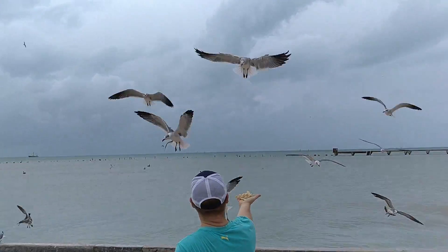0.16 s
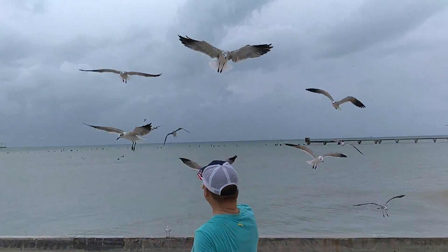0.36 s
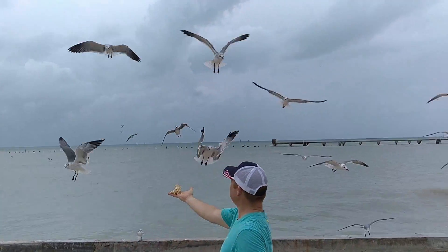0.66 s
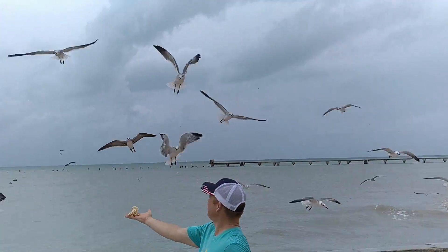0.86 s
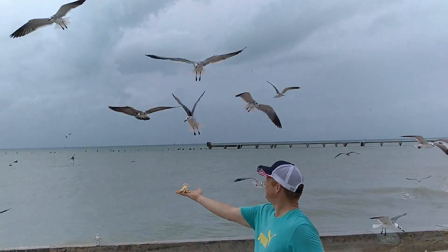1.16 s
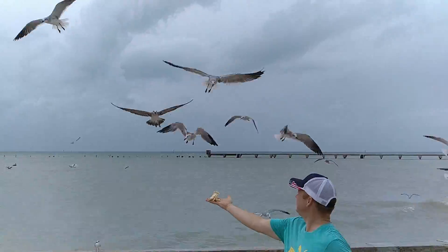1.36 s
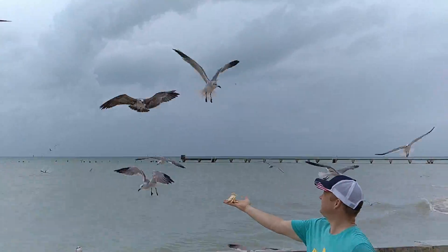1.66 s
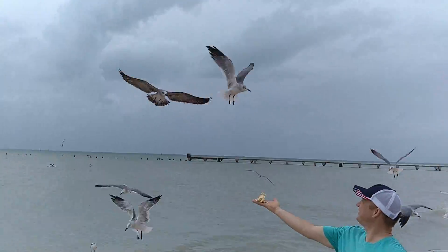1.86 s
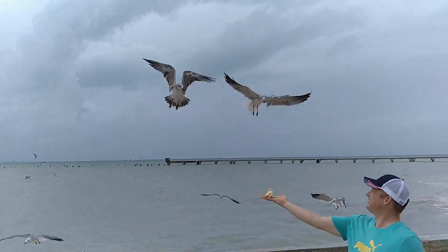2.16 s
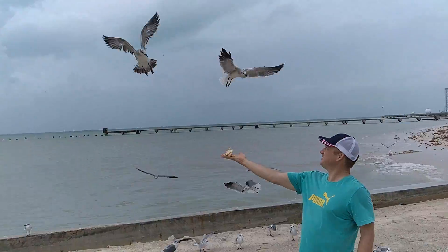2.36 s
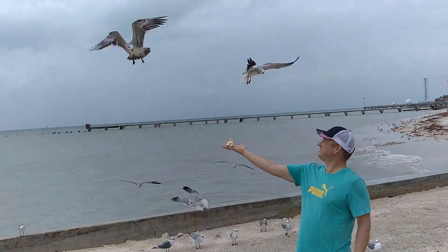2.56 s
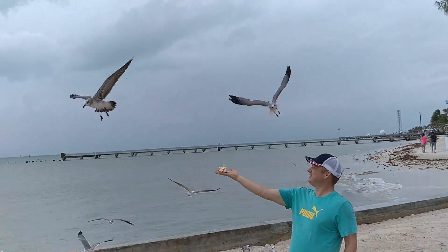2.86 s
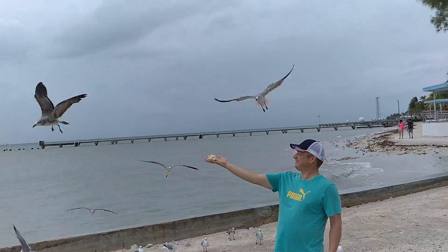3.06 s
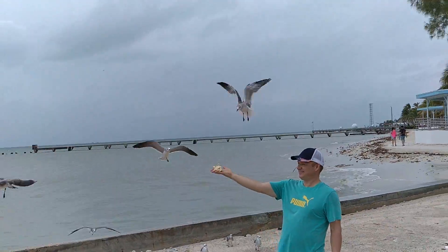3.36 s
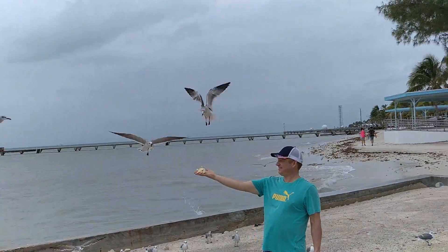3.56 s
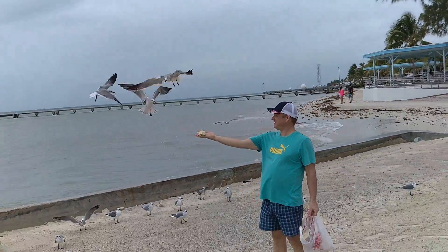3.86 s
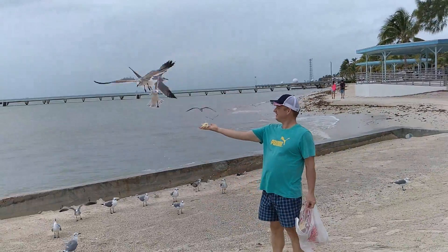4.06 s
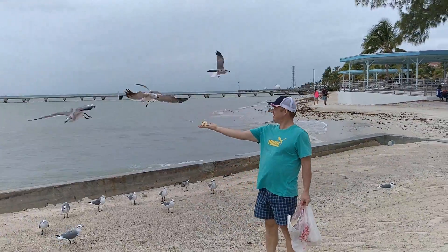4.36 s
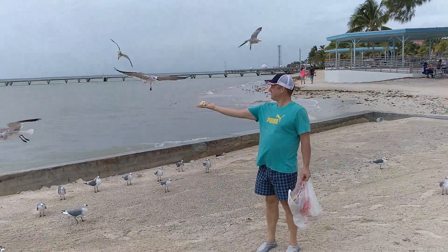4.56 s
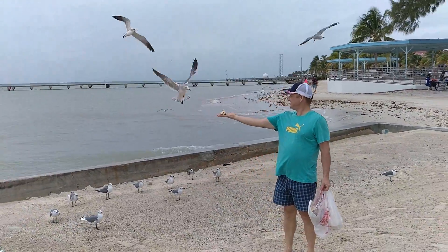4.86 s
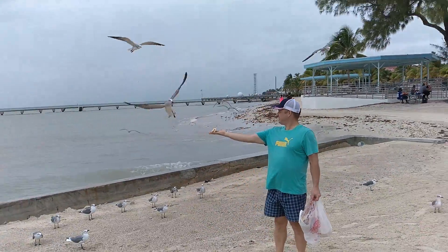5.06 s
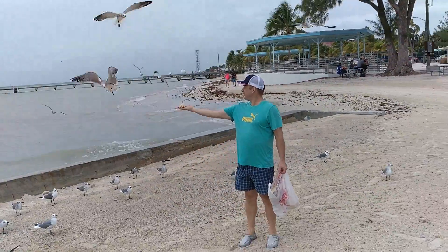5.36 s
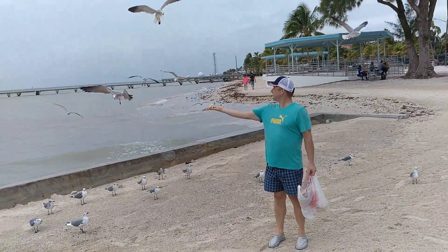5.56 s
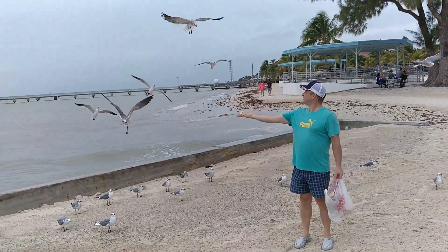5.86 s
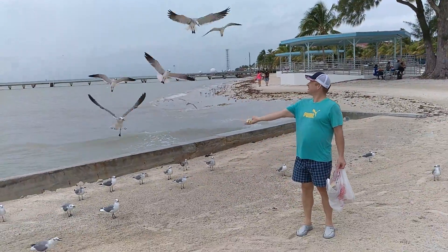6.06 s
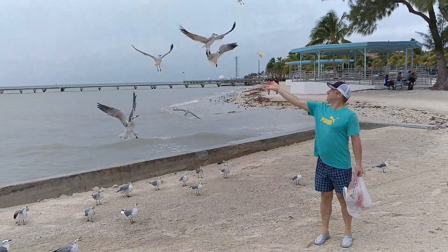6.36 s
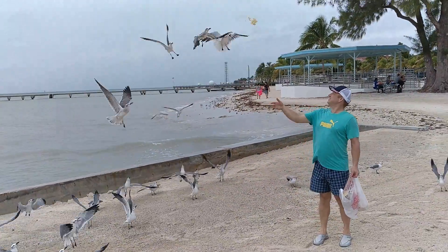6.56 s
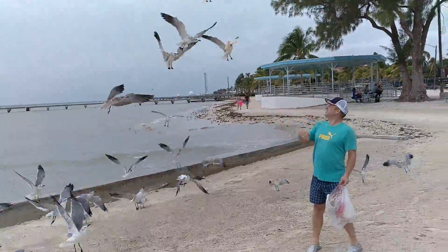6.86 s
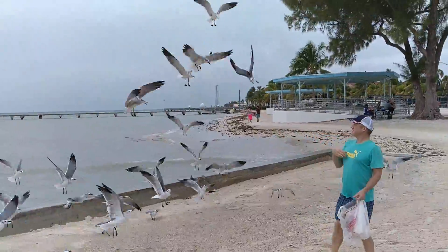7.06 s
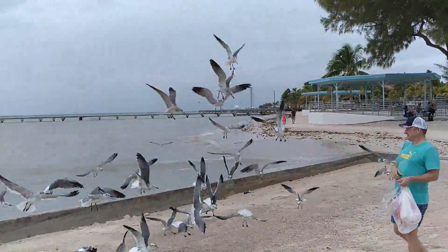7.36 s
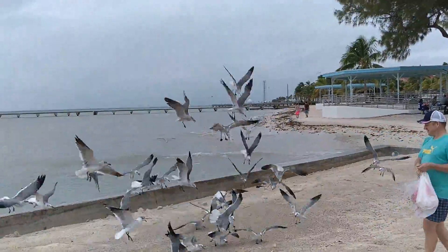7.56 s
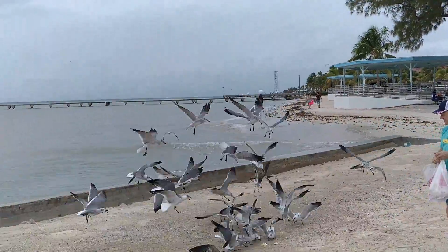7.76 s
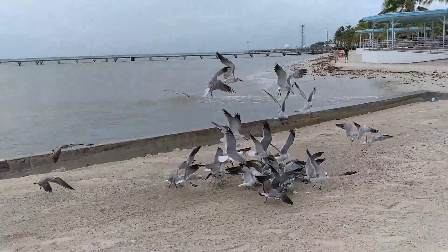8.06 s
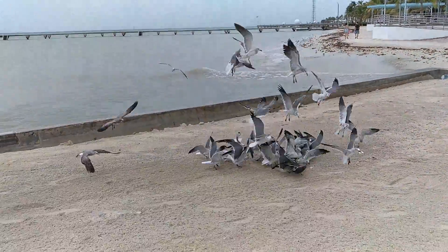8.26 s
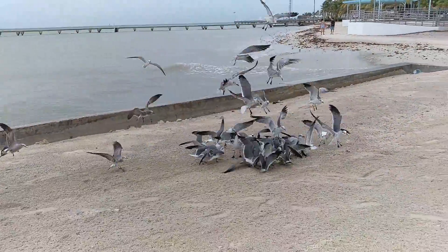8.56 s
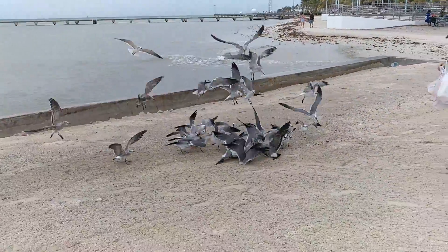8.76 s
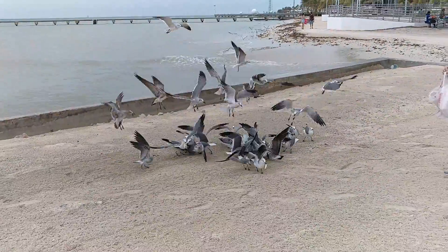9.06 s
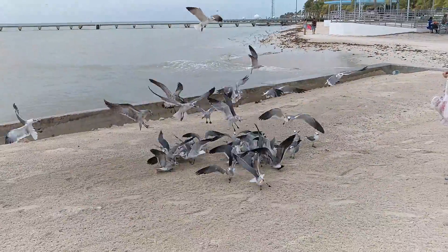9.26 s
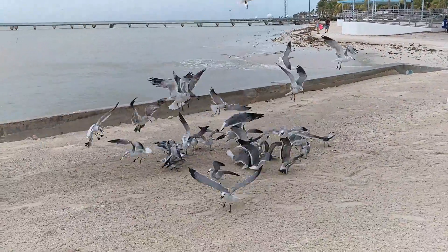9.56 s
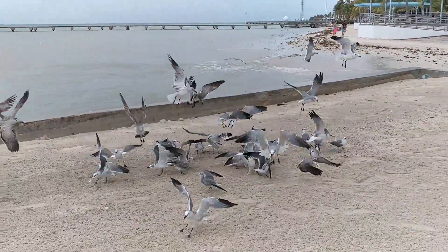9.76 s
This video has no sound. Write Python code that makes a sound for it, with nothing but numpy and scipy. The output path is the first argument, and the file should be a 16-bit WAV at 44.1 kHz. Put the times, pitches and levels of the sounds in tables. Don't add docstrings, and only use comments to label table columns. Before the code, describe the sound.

Outdoors on an open beach, a gull flock calls a few metres from a small stereo microphone. Round hoots and hoarse rasps open in a puff of wind, then nasal croaks, thin squeaks and cries that crack upward. Later the calls thicken and explode into a dense, screaming food fight, easing to hoarse squabbling while low wind thumps hit the microphone over faint surf.

```python
import sys
import numpy as np
from scipy import signal
from scipy.fft import rfft, irfft, next_fast_len
from scipy.io import wavfile
from scipy.ndimage import uniform_filter1d, minimum_filter1d

SR = 44100
rng = np.random.default_rng(int(sys.argv[2]) if len(sys.argv) > 2 else 0)


def transcribe(signal):
    frames = np.atleast_2d(signal).T
    limited = np.clip(frames, -1, 1)
    pcm = np.round(limited * 32767).astype(np.int16)
    wavfile.write(sys.argv[1], SR, pcm)


def field_ratio(decibels):
    return 10 ** (np.asarray(decibels, dtype=float) / 20)


N = 437472

# t/s, left delay/samples
BEARING = [(0, 9), (6.3, 10), (7, 6), (8, 0), (9, 2)]
# t/s, level/dB
TIRING = [(7.9, 4.5), (8.3, 0.5), (8.31, 2)]
NOTE_FALL_DB = 9.5
NASAL_BEAK_DB = -18.5


def evened(x):
    return x / np.sqrt(np.mean(x ** 2) + 1e-20)


def coloured(x, points):
    size = next_fast_len(N)
    f, db = np.transpose(points)
    log_hz = np.log(np.fft.rfftfreq(size, 1 / SR) + 1)
    gain = field_ratio(np.interp(log_hz, np.log(f), db, left=-90, right=-90))
    return evened(irfft(rfft(x, size) * gain, size)[..., :N])


def wander(shape, span):
    span = max(int(span), 2)
    noise = rng.standard_normal(shape)
    return uniform_filter1d(uniform_filter1d(noise, span), span) * np.sqrt(1.5 * span)


def along(rows, column):
    rows = np.array(rows)
    return np.interp(np.arange(N) / SR, rows[:, 0], rows[:, column])


def surf():
    # f/Hz, level/dB
    surf_colour = [(500, -2), (900, -4), (3000, -13), (4500, -23.5), (15500, -26.5)]
    near, apart = rng.standard_normal(N), rng.standard_normal((2, N))
    level = field_ratio(-47 + 2.0 * wander(N, 28500))
    return level * coloured(near + .5 * apart, surf_colour)


def wind():
    # t/s, level/dB
    wind_level = [(0.0, -24), (0.33, -39.5), (2.37, -39), (2.57, -34), (2.6, -36.5), (3.5, -34.5),
                  (4.2, -35.5), (5.6, -38.5), (6.1, -35.5), (6.6, -38), (7.93, -39), (8.01, -27),
                  (9.59, -28), (9.92, -19)]
    # f/Hz, level/dB
    wind_colour = [(18, -19.5), (40, -12), (80, -1.5), (140, -1.5), (250, -10), (700, -28)]
    # t/s, half the left-right difference/dB
    wind_side = [(0, 1), (9.4, 1.25), (9.7, -2)]
    # t/s, peak level/dB, left-right difference/dB
    thumps = [
        (3.151, -10, 18),
        (7.986, -7, -28.5),
        (8.787, -8, 22.5),
              (2.534, -12.5, 24.5),
        (6.43, -15.5, 11.7),
        (6.459, -14, 17.4),
        (6.502, -16.5, 11.47),
              (8.069, -8.5, 8),
        (8.157, -12, -15),
        (8.63, -24, -15.5),
        (8.789, -18.5, 12),
        (8.943, -7, 25.5),
        (9.343, -13.5, 3.5),
    ]
    lumps = field_ratio(2.5 * wander((2, N), 900) + 1.2 * wander((2, N), 5000))
    out = rng.standard_normal((2, N)) * lumps
    out = out + .08 * out[::-1]
    side_db = along(wind_side, 1) * np.array([[1], [-1]])
    out = coloured(out, wind_colour) * field_ratio(along(wind_level, 1) + 2.5 + side_db)
    u = np.arange(-800, 800) / SR * 450
    pressure_pulse = (1 - 2 * u ** 2) * np.exp(-u ** 2)
    for s, db, pan_db in thumps:
        port_gain = np.minimum(field_ratio(np.array([[pan_db], [-pan_db]])), 1)
        start = round((s + .007) * SR) - 800
        out[:, start:][:, :1600] += field_ratio(db) * pressure_pulse * port_gain
    return out


def held(column, blur=800):
    # t/s, length/s, level/dB, treble
    # over body/dB
    chatter = [(0.0, 0.51, -32.5, -12), (0.512, 1.29, -29, -4), (1.895, 0.4, -40, -1),
               (2.819, 0.94, -31, -8), (3.725, 0.13, -45, -47.5), (3.834, 0.62, -33, -38.5),
               (4.341, 0.58, -34.5, 3.5), (5.522, 0.44, -34, -35), (6.047, 0.32, -34, -42.5),
               (5.204, 0.032, -49, -3), (5.29, .23, -48, 9), (6.37, 0.092, -34.5, 6),
               (6.47, .95, -31, -1.5), (7.355, .3, -24, -7.5), (7.614, .6, -17.5, -2.5),
               (8.103, .25, -18, -0.5), (8.306, .95, -27.5, -13.5), (9.188, 0.74, -30, -12)]
    squawks = [(0.0, 0.219, -30, -5.5), (0.805, 0.223, -24.5, -3), (0.86, 0.029, -18, -6.5),
               (1.194, 0.2184, -25, -3.5), (1.572, 0.097, -24.5, -5), (1.724, 0.1467, -28.5, 2.5),
               (1.996, 0.0417, -22, -15), (2.147, 0.111, -27, -10.5), (2.393, 0.119, -24.5, -7),
               (2.577, 0.103, -29, 0.5), (2.818, 0.164, -28.5, -5.5), (3.052, 0.0744, -29.5, -4),
               (3.288, 0.0382, -23.5, -11.5), (5.424, .012, -32.5, 1), (3.448, 0.0608, -31.5, -7),
               (3.83, 0.0604, -34, -48.5), (4.045, 0.1724, -32, -18), (4.206, 0.0635, -26.5, -10),
               (4.35, 0.1177, -26, -4.5), (4.599, 0.0667, -30.5, -0.5), (5.518, 0.087, -30, -19),
               (6.039, 0.027, -35.5, -47.5), (6.265, 0.048, -26.5, -28), (6.466, 0.12, -26.5, -5.5),
               (6.911, 0.0515, -27.5, 5), (7.048, 0.0304, -23, -8.5), (7.095, 0.106, -28, -11.5),
               (8.305, 0.2367, -23.5, -6), (8.628, 0.217, -22.5, -8), (9.256, 0.0632, -26.5, 0.5),
               (9.716, 0.172, -35.5, -35.5), (9.901, 0.033, -25, -29)]
    lull = (12, 0, -63.5, -3)
    out = np.full(N, float(lull[column]))
    for row in chatter + squawks:
        out[round(row[0] * SR):round((row[0] + row[1]) * SR)] = row[column]
    return uniform_filter1d(out, int(blur), mode="nearest")


def patchy(x, depth_db=3.5):
    z = signal.stft(x, nperseg=512)[2]
    patches = evened(wander(z.shape[1:], 12))
    patches = evened(uniform_filter1d(patches, 6, axis=0))
    out = signal.istft(z * field_ratio(depth_db * patches), nperseg=512)[1][:, :N]
    return out / field_ratio(depth_db ** 2 / 8.7)


def rasp():
    pulse_rates = [252.56, 290.32, 505.86]
    # f/Hz, level/dB
    throat_body = [(600, -30.5), (1300, -18), (1800, -7.5), (2400, -7), (3500, -12.5), (4500, -14),
                   (5500, -15)]
    # f/Hz, level/dB
    throat_treble = [(5200, -15.5), (6100, 2.5), (6900, -2), (7900, -8), (9500, -3.5), (12000, -8.5),
                     (13000, -18), (16000, -16.5)]
    # f/Hz, level/dB
    full_stretch = [(2600, -22.5), (3300, -1), (4000, 1), (5000, -17.5), (5800, -10)]
    # t/s, level over the body/dB
    stretching = [(7.55, -53), (7.7, -7.5), (8.3, -6.5), (8.8, -17), (9.0, -37.5)]
    drive = np.zeros((2, N))
    since = np.arange(N) / SR - held(column=0, blur=1)
    for hz, spread in zip(pulse_rates, (0, -3, 2)):
        climb = .25 * np.tanh(since / .1)
        jitter = .06 * wander(N, 4000) + .035 * wander(N, 90)
        turns = np.cumsum(hz * (1 + climb + jitter)) / SR
        pulses = np.diff(np.floor(turns), prepend=0) * field_ratio(2.0 * rng.standard_normal(N))
        puffs = np.exp(-(turns % 1) / 2.6) * rng.standard_normal(N)
        bird = (evened(pulses) + .15 * evened(puffs)) * field_ratio(7.0 * wander(N, 5000))
        late = np.clip(np.arange(N) - along(BEARING, 1) - spread, 0, N - 1)
        drive += [bird[late.astype(int)], bird]
    drive = irfft(rfft(drive) * np.exp(-400j * np.fft.rfftfreq(N) ** 2 * np.pi), N)
    drive /= np.sqrt(uniform_filter1d(drive[1] ** 2, 1500) + 1e-3)
    drive = patchy(drive + .2 * rng.standard_normal((2, N)))
    body = coloured(drive, throat_body)
    treble = coloured(drive, throat_treble) * field_ratio(held(column=3))
    strain = coloured(drive, full_stretch) * field_ratio(along(stretching, 1))
    return field_ratio(held(column=2) + along(TIRING, 1)) * (body + treble + strain)


def syrinx_tone(mix, rows, db, throat_hz, fall_db, delay, waver=0.00507, flutter_db=2.0, beak_db=-31,
                notch_db=0, swell_db=2.61, hoarse=0):
    # first t/s, last t/s
    scream_span = (7.5, 8.4)
    s, hz = np.transpose(rows)
    t = np.arange(s[0] - .006, s[-1] + 0.0075, 1 / SR)
    hz = uniform_filter1d(np.interp(t, s, hz), min(len(t) // 4, 400), mode="nearest")
    fighting = s[0] > 8.9
    hz *= 1 + waver * wander(len(t), 260) + fighting * .004 * wander(len(t), 600)
    hoarse = max(hoarse, scream_span[0] < s[0] < scream_span[1])
    hz *= 1 + hoarse * .009 * wander(len(t), 110)
    k = np.arange(1, min(int(15500 / hz.max()), 20) + 1)[:, None]
    octaves = np.log2(k * hz / throat_hz)
    slope_db = -fall_db * np.where(octaves > 0, octaves, -1.3 * octaves)
    air_db = 2.0 * np.maximum(k * hz / 1000 - 10, 0)
    shape = field_ratio(slope_db - 4.32 * octaves ** 2 - air_db)
    beak_peak_db = beak_db - (s[0] > 8.85) * 14.7
    shape = shape + shape.max(0) * field_ratio(beak_peak_db - 12.4 * np.log2(k * hz / 10800) ** 2)
    shape = shape * field_ratio(notch_db * np.exp(-((k * hz - 5700) / 900) ** 2))
    flutter = field_ratio(flutter_db * wander((len(k), len(t)), 500))
    shape = shape / np.sqrt((shape ** 2).sum(0) / 2) * flutter
    middle = 2 * (t - t[0]) / (t[-1] - t[0]) - 1
    fade = np.clip(np.minimum(t - t[0], t[-1] - t) / 0.00682, 0, 1)
    level = field_ratio(db - swell_db * middle ** 2) * fade
    level = level * field_ratio(fighting * 2 * wander(len(t), 700) + hoarse * 3.5 * wander(len(t), 150))
    turns = np.cumsum(hz) / SR
    for port, late in zip(mix, (delay, 0)):
        phase = 2 * np.pi * k * (turns - hz * (late % 1) / SR) + k ** 2
        tone = level * (shape * np.sin(phase)).sum(0)
        part = port[max(round(t[0] * SR) + int(late // 1), 0):][:len(t)]
        part += tone[:len(part)]


def brawl(count=200):
    mix = np.zeros((2, N))
    for when, pitch, bend, length, place, db in rng.random((count, 6)):
        s, hz = 9.8 * (1 - when ** 2.4), 1000 * 2.6 ** pitch
        end = s + .07 + .1 * length
        arch = [(s, hz * (1 - .15 * bend)), (s + .03, hz), (end - .03, hz * 1.03), (end, hz * .9)]
        syrinx_tone(mix, arch, 5.0 * db, 2600 + 700 * bend, 9.0, 14 * place - 2,
                    waver=0.0135, flutter_db=4, beak_db=-45)
    return field_ratio(held(column=2, blur=1500) + along(TIRING, 1) - 11.5) * mix


def short_notes(mix):
    # t/s, length/s, first f/Hz, last f/Hz, level/dB
    squeaks = [(0.006, 0.038, 5080, 4860, -29), (1.046, 0.112, 3454, 3302, -31.5),
               (1.876, 0.083, 3305, 3100, -43), (2.59, 0.06, 4231, 4181, -24.5),
               (4.087, 0.112, 4663, 4869, -43), (6.57, 0.019, 3715, 3625, -22.5),
               (6.541, 0.0462, 2500, 2836, -24), (7.553, 0.117, 2386, 2658, -21.5),
               (8.854, 0.1122, 3151, 3126, -33), (9.181, 0.0385, 2425, 2224, -22.5),
               (9.267, 0.063, 2412, 2688, -28.5), (9.707, 0.168, 3302, 3468, -31.5),
               (2.509, 0.092, 2889, 3172, -24.5), (2.761, 0.168, 3367, 3063, -29.5),
               (4.2, 0.087, 3297, 3246, -23.5), (4.962, 0.0223, 3306, 2942, -29.5),
               (6.75, 0.0807, 4231, 3930, -33), (7.271, 0.0648, 3400, 3518, -20.5),
               (7.353, 0.233, 3370, 3211, -27.5), (9.284, 0.043, 3540, 3806, -28.5),
               (9.342, 0.0445, 3386, 3374, -26.5), (1.237, 0.0295, 3750, 3940, -32),
               (1.265, .04, 3450, 3600, -24.5), (1.239, 0.027, 2870, 2926, -37),
               (0.081, 0.0523, 3690, 3982, -35.5), (5.081, 0.03, 5440, 5070, -53.5),
               (5.098, 0.096, 3137, 3280, -55.5), (9.57, 0.0153, 4737, 4555, -33.5),
               (9.61, 0.0246, 2446, 2232, -24.5), (9.428, 0.0774, 3600, 3380, -28.5),
               (9.536, 0.0294, 3395, 3625, -28)]
    yelps = [(0.432, 0.062, 1655, 1938, -22.5), (0.604, 0.21, 2375, 2381, -28),
             (1.206, 0.127, 1937, 2155, -20), (5.791, 0.0565, 1863, 2015, -22),
             (5.868, 0.028, 1947, 1747, -19), (6.738, 0.0703, 1492, 1337, -34),
             (6.635, 0.064, 2164, 1953, -22.5), (1.13, 0.126, 2150, 2300, -37.5),
             (2.876, 0.016, 2014, 1882, -19.5), (6.422, 0.0802, 1259, 1360, -31.5),
             (7.802, 0.1198, 1830, 1950, -43), (8.03, 0.0802, 1497, 1563, -32.5),
             (8.241, 0.1126, 1706, 1630, -26), (8.365, 0.082, 1634, 1567, -29.5),
             (8.888, 0.02707, 2235, 1906, -28.5), (8.899, .07, 1430, 1362, -31.5),
             (9.0, 0.0845, 1975, 1820, -28.5), (9.069, 0.032, 2388, 2498, -36.5),
             (9.123, 0.0352, 1802, 1562, -30.5), (9.6, 0.099, 2395, 2353, -34.5),
             (9.897, 0.031, 2025, 2246, -24), (6.925, 0.0874, 2000, 2174, -28)]
    barks = [(0.756, 0.15, 1320, 1330, -52.5), (3.209, 0.074, 994, 982.7, -23.5),
             (3.319, 0.146, 917.3, 1039, -24.5), (4.156, 0.0507, 1147, 1188, -23.5),
             (4.391, 0.029, 1187, 1259, -17.5), (5.294, 0.0205, 1444, 1608, -29.5),
             (5.519, 0.059, 332.4, 403, -36.5), (5.78, 0.089, 1431, 1460, -30.5),
             (6.631, 0.095, 696, 641, -31.5), (6.938, 0.0454, 1009, 1020, -19.5),
             (8.55, 0.044, 1291, 1006, -30)]
    notes = [(row, 1.371 * row[2], -28) for row in squeaks]
    notes += [(row, row[2], -36) for row in yelps]
    notes += [(row, 2554, NASAL_BEAK_DB) for row in barks]
    for (s, length, first, last, db), throat_hz, beak_db in notes:
        glide = [(s, first), (s + length / 2, first + .6 * (last - first)), (s + length, last)]
        delay = np.interp(s, *np.transpose(BEARING))
        syrinx_tone(mix, glide, db, throat_hz, NOTE_FALL_DB, delay, beak_db=beak_db)


def hoots(mix):
    # t/s, length/s, f/Hz, level/dB
    hoot_rows = [
        (0.0, 0.047, 1571, -28),
        (0.15, 0.076, 1587, -22.5),
        (0.321, .095, 1577, -21),
        (0.509, 0.0814, 1546, -23),
    ]
    for s, length, hz, db in hoot_rows:
        scoop = 0.14 * (s > .1)
        arch = [(s, hz * (1 - scoop)), (s + .25 * length, hz), (s + .8 * length, hz), (s + length, .94 * hz)]
        syrinx_tone(mix, arch, db, hz, 16.0, 8, beak_db=-36, swell_db=13, hoarse=.4)


def broken_calls(mix):
    # t/s, climb/s, break/s, level/dB, left delay/samples
    yodels = [
        (3.087, 0.089, 0.1423, -23, 12.9),
        (3.508, 0.0938, 0.1117, -24.5, 14.11),
        (3.886, 0.0992, 0.1012, -26.5, 14.12),
        (4.259, 0.0836, 0.1104, -23.5, 13.46),
        (4.641, 0.11, 0.083, -28.5, 14.04),
        (6.085, 0.1295, 0.0951, -23.5, 9.82),
    ]
    # first f/Hz, middle f/Hz, last f/Hz, throat centre f/Hz, level/dB
    yodel_parts = [
        (1300, 1390, 1455, 2500, 0.1),
        (1960, 2020, 1830, 1800, 3.5),
    ]
    # t/s, climb/s, hold/s, drop/s, level/dB
    croaks = [
        (0.808, 0.0596, 0.042, 0.15, -27),
        (1.201, 0.0576, 0.0578, 0.147, -27),
        (1.588, 0.0786, 0.0645, 0.1288, -25),
        (2.004, 0.0715, 0.0769, 0.0865, -24.5),
        (2.404, .098, .115, 0.046, -27),
        (2.839, 0.1193, 0.184, 0.0146, -29),
    ]
    croak_parts = [
        (870, 968, 1010, 3000, 8),
        (1160, 1197, 1210, 3000, 0),
        (605, 600, 596, 2050, 3),
        (596, 545, 500, 2700, -1),
    ]
    broken = [(s, lengths, db, delay, yodel_parts, -34, 0) for s, *lengths, db, delay in yodels]
    broken += [(s, lengths + [0.028], db, 7.986, croak_parts, NASAL_BEAK_DB, -35)
               for s, *lengths, db in croaks]
    for s, lengths, db, delay, parts, beak_db, notch_db in broken:
        ends = s + np.cumsum(lengths)
        for end, length, (first, middle, last, throat_hz, part_db) in zip(ends, lengths, parts):
            glide = [(end - length, first), (end - 0.28 * length, middle), (end, last)]
            syrinx_tone(mix, glide, db + part_db, throat_hz, 7.5, delay, beak_db=beak_db, notch_db=notch_db)


def bent_cries(mix):
    # t/s, length/s, middle f/Hz, bend of the start/ratio, bend of the end/ratio
    bends = [(2.519, 0.2437, 2002, 0.069, 0.0544), (4.405, 0.1035, 3498, -0.053, 0.0743),
             (5.638, 0.1526, 1418, -0.015, 0.0243), (5.842, 0.1534, 1720, -0.088, -0.097),
             (6.529, 0.118, 1355, -0.091, 0.08), (6.609, 0.0736, 3327, 0.054, 0.079),
             (7.122, 0.0937, 3511, 0.037, 0.029), (7.467, 0.1576, 1368, 0.044, -0.0047),
             (7.977, 0.0444, 3070, 0.379, -0.0065), (8.304, 0.1463, 3208, 0.014, 0.024),
             (8.709, 0.0584, 3801, -0.15, 0.073), (9.778, 0.057, 2050, -0.00035, -0.12),
             (7.418, 0.076, 1161, -0.146, -0.078), (2.967, 0.058, 6447, -0.064, -0.103)]
    # level/dB, throat centre f/Hz, left delay/samples
    bent_voices = [(-25.5, 2350, 7), (-23, 5870, -2), (-25, 2287, 12), (-28, 2330, 6), (-25, 2050, 11.5),
                   (-20, 2540, 8), (-24.5, 4600, -2.5), (-23, 2206, 6.5), (-17.5, 2700, 16.5),
                   (-24.5, 5020, 8), (-16, 3140, -1), (-32.5, 2000, 5.5), (-16, 2440, 7),
                   (-27.5, 6100, 9.5)]
    for (s, length, hz, first, last), (db, throat_hz, delay) in zip(bends, bent_voices):
        curve = [(s, hz * (1 + first)), (s + length / 2, hz), (s + length, hz * (1 + last))]
        syrinx_tone(mix, curve, db, throat_hz, NOTE_FALL_DB, delay)


def wails(mix):
    # t/s, f/Hz
    cries = [
        [(0.06, 830), (0.125, 970), (0.135, 1102), (0.2, 1187), (0.275, 1168), (0.305, 829)],
        [(1.02, 4555), (1.06, 4668), (1.13, 4487), (1.16, 4293), (1.25, 4341), (1.3, 4196), (1.33, 4010)],
        [(1.41, 2387), (1.47, 2559), (1.57, 2554), (1.6, 2517), (1.66, 2552), (1.71, 2405)],
        [(1.747, 4220), (2.043, 4317), (2.084, 4271), (2.119, 3896)],
        [(4.515, 4725), (4.56, 4727), (4.79, 4544), (4.92, 4504), (4.965, 4242)],
        [(5.33, 4600), (5.345, 4823), (5.39, 4788), (5.41, 5009), (5.45, 4946)],
        [(6.695, 3147), (6.725, 3312), (6.745, 2867), (6.8, 2641), (6.87, 2840), (6.915, 3323), (6.99, 3132),
         (7.03, 3244)],
        [(7.03, 4391), (7.07, 4604), (7.15, 4737), (7.19, 4253)],
        [(7.555, 1049), (7.6, 1135), (7.67, 1016), (7.715, 1155), (7.92, 1200), (8.05, 1142), (8.13, 1187),
         (8.22, 1243), (8.33, 1097)],
        [(8.44, 3300), (8.53, 3469), (8.56, 4723), (8.6, 4917), (8.65, 4407), (8.71, 4108)],
        [(8.7, 3332), (8.74, 3887), (8.765, 4767), (8.8, 4528), (8.835, 4210)],
        [(0.56, 2750), (0.62, 2593), (0.68, 2692), (0.78, 2704), (0.86, 2552)],
        [(7.815, 4413), (7.9, 4239), (7.95, 4412), (7.98, 4350), (8.0, 3944)],
    ]
    more_cries = [
        [(9.31, 4470), (9.335, 4349), (9.365, 4780), (9.39, 4819), (9.41, 4480), (9.44, 4630)],
        [(9.38, 2073), (9.43, 2430), (9.46, 2498), (9.5, 2309), (9.525, 2450), (9.55, 2433), (9.565, 2333),
         (9.585, 2377)],
        [(9.6, 1421), (9.645, 1649), (9.67, 2075), (9.7, 1499), (9.73, 1971), (9.755, 1727), (9.775, 1885),
         (9.79, 1390), (9.85, 1255)],
        [(9.63, 4062), (9.66, 3980), (9.68, 3774), (9.74, 3762), (9.83, 3520), (9.85, 3190), (9.88, 3381),
         (9.92, 3310)],
        [(6.378, 1149), (6.39, 1244), (6.41, 1219), (6.435, 1170)],
        [(5.455, 4831), (5.5, 4691), (5.64, 4398), (5.675, 4126)],
        [(0.88, 3440), (0.91, 3270), (0.96, 3355), (1.02, 3576)],
        [(7.0, 2923), (7.02, 3130), (7.05, 3466), (7.115, 3530)],
        [(7.635, 3209), (7.7, 2934)],
        [(8.05, 3521), (8.1, 3750), (8.16, 3544), (8.22, 3777), (8.3, 3541)],
    ]
    # level/dB, throat centre f/Hz, fall/dB per octave, left delay/samples
    voices = [(-23, 2220, 17, 7.45), (-21.5, 4340, 1.5, 8.22), (-21, 5000, -4.5, 10.02),
              (-26, 5110, 4, 12.72), (-23.5, 6604, 25.5, 8.72), (-25.5, 5970, 19.5, 7.82),
              (-20.5, 2295, 0.5, 9.35), (-18.5, 6110, 45, 3.18), (-15, 2651, 13, 5.54),
              (-24, 4430, 12, 9.354), (-20.5, 4300, 1.5, 8.58), (-25, 8770, 1, 8.92),
              (-13, 5380, 11, 3.945), (-24.5, 5330, 14, 3.38), (-28, 3480, 10.5, 1.53),
              (-33, 2080, 17.5, 3.9), (-28.5, 4330, 20, 1.88), (-21.5, 3400, -1, 11.24),
              (-28, 4040, 17.5, 7.88), (-21, 3250, 11.5, 11.9), (-32.5, 8300, 5, 6), (-24, 3100, 12.5, 4.6),
              (-24, 3915, 5, 1.824)]
    for rows, voice in zip(cries + more_cries, voices):
        syrinx_tone(mix, rows, *voice)


def calls():
    mix = np.zeros((2, N))
    for voice in (short_notes, hoots, broken_calls, bent_cries, wails):
        voice(mix)
    return mix


def scene():
    clean, rough = calls(), brawl() + rasp()
    clean_power, rough_power = (uniform_filter1d(x[1] ** 2, 900) + 1e-12 for x in (clean, rough))
    birds = clean + rough * (rough_power / (rough_power + clean_power)) ** .85
    scatter = rng.standard_normal((2, 3000)) * field_ratio(-60 * np.arange(3000) / SR / 0.0802)
    scatter[:, :130] = 0
    echo = signal.oaconvolve(birds, scatter / np.linalg.norm(scatter[0]), axes=1)[:, :N]
    return birds + field_ratio(-14) * echo + wind() + surf()


def roll_off(x):
    return signal.sosfilt(signal.butter(12, 15670, fs=SR, output="sos"), x)


def record(dry):
    # f/Hz, left-right difference/dB
    port_tilt = [(80, 2.5), (300, -3), (1400, 3.5), (3500, -2.5), (6000, 0.5), (8500, 4.5), (11500, 5.5),
                 (15000, -12)]
    hz, t, z = signal.stft(np.clip(dry, -1, 1), SR, nperseg=1024)
    row_hz = hz[:, None]
    db = 10 * np.log10(uniform_filter1d(abs(z) ** 2, 5, axis=1) + 1e-14)
    loudest_db = -minimum_filter1d(-db, 51, axis=1)
    masked = ((db < loudest_db - 21) | (db < -85)) & (row_hz > 2500)
    band_db = uniform_filter1d(uniform_filter1d(db, size=15, axis=1), size=3, axis=2)
    band_db = band_db - db[:, 30:].max(1, keepdims=True)
    floor_db = np.where(row_hz > 9000, -45, np.where(row_hz > 4800, -34, -99))
    masked |= band_db < floor_db + 4 * (row_hz > 11000) * (t > 8.5)
    valley_db = 3.5 + 2 * (abs(t - 8) < .5)
    masked |= (band_db < uniform_filter1d(band_db, size=61, axis=1) - valley_db) & (row_hz > 2600)
    tilt_db = np.interp(hz, *np.transpose(port_tilt))[:, None] * np.array([.5, -.5])[:, None, None]
    thinned = np.where(masked, .03 * z, z) * field_ratio(tilt_db)
    kept = signal.istft(thinned, SR, nperseg=1024)[1][:, :N]
    return roll_off(np.clip(kept, -1, 1))


dry = scene()
out = record(dry)
transcribe(out)
```